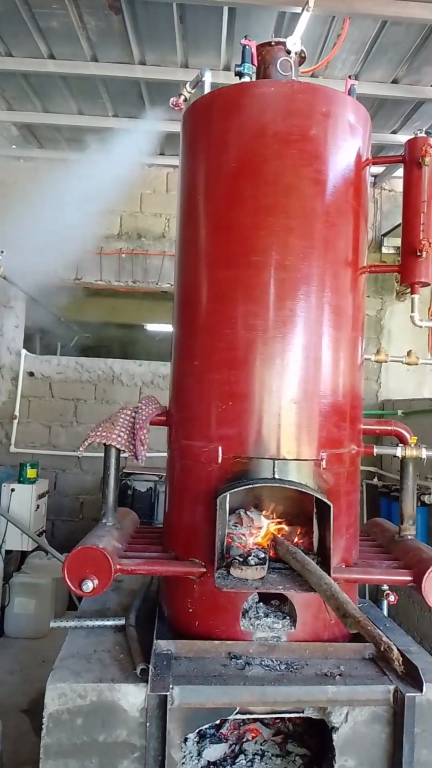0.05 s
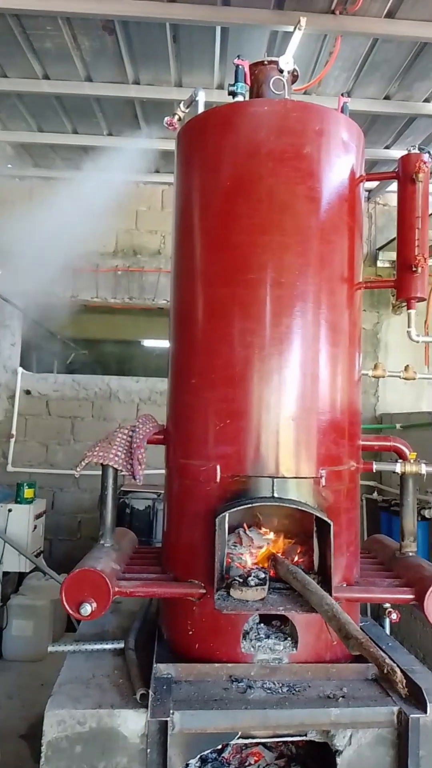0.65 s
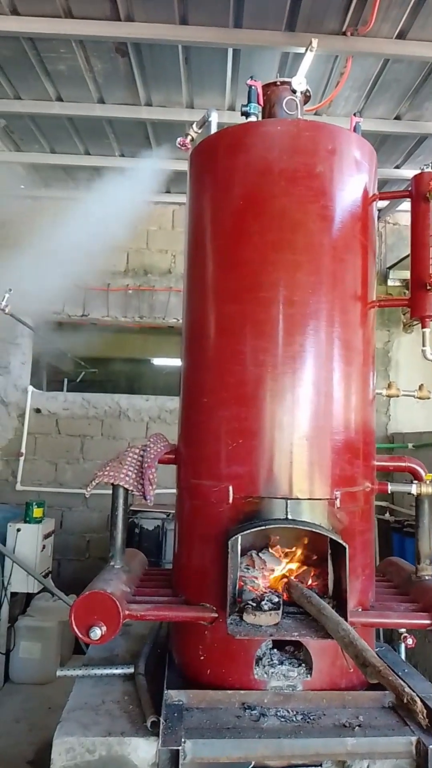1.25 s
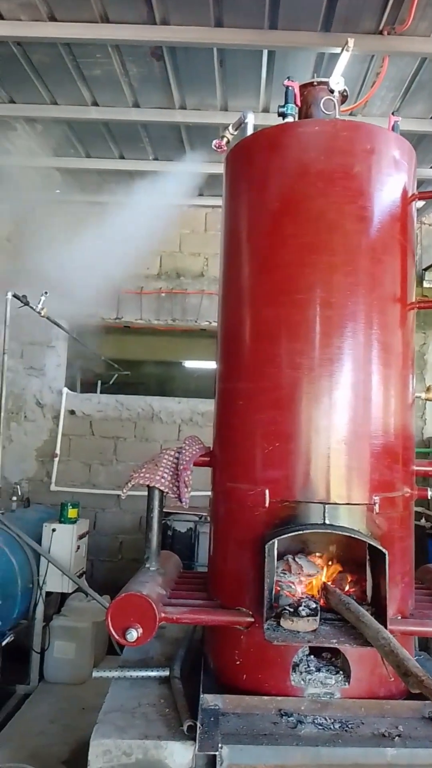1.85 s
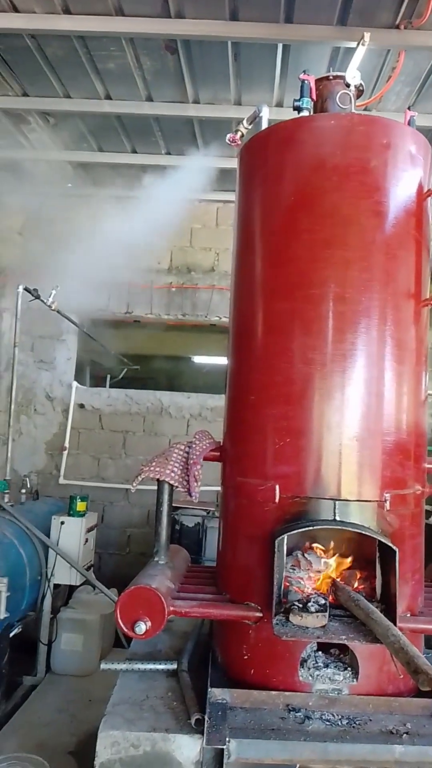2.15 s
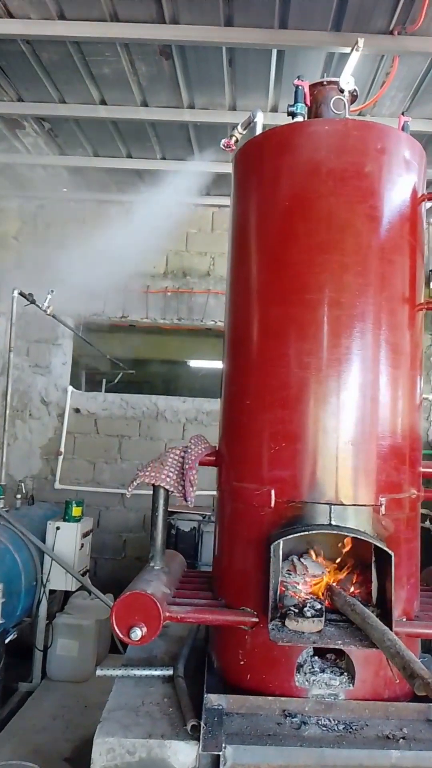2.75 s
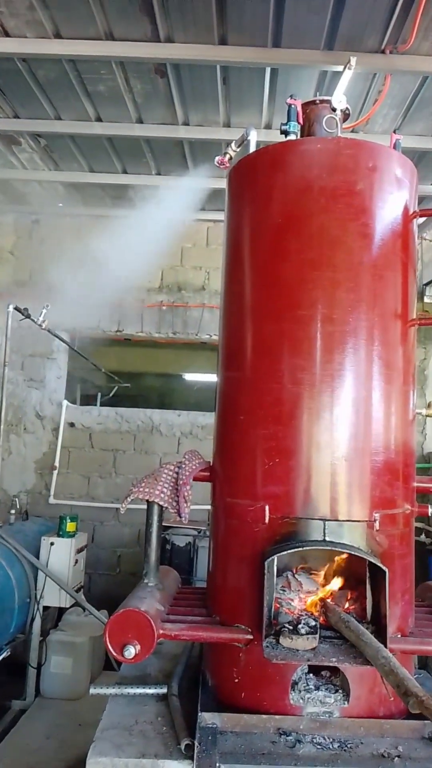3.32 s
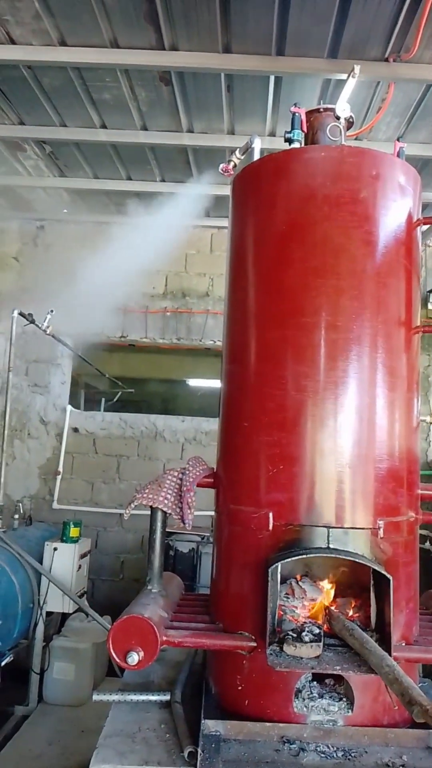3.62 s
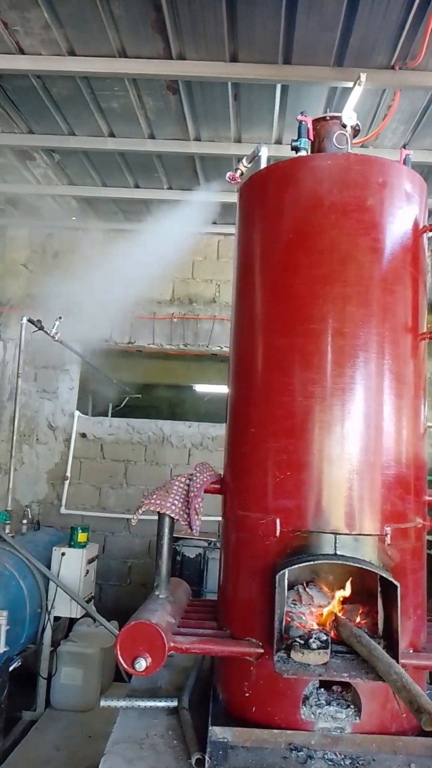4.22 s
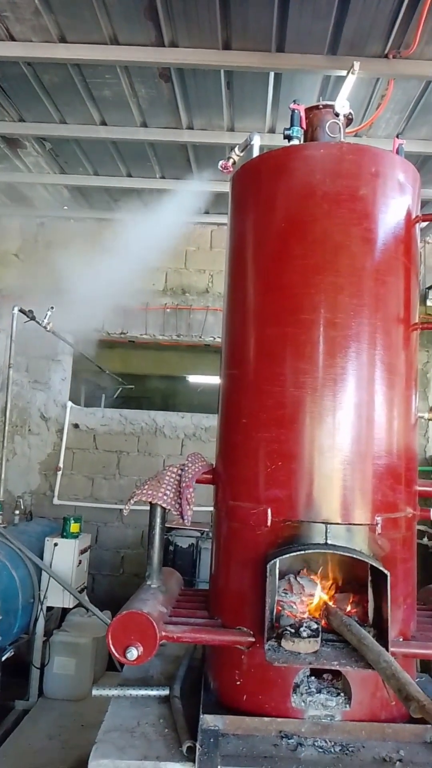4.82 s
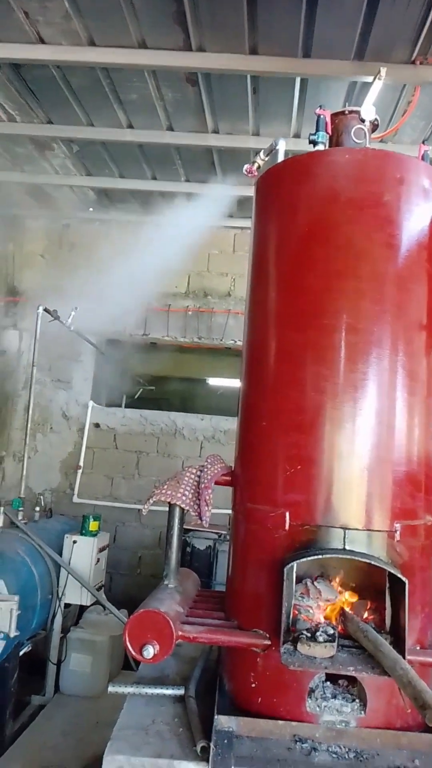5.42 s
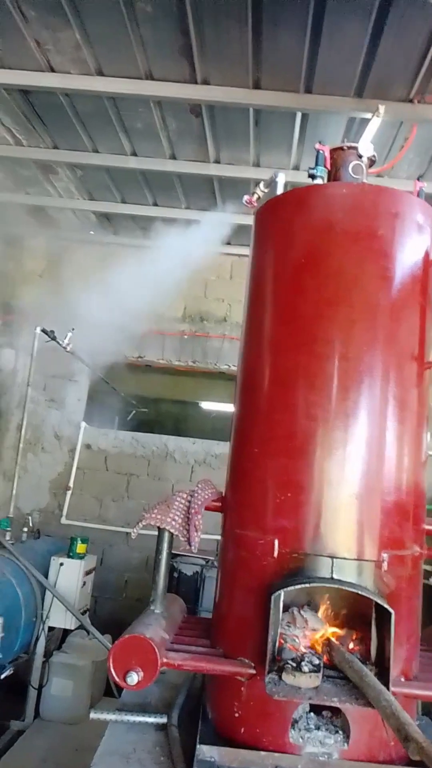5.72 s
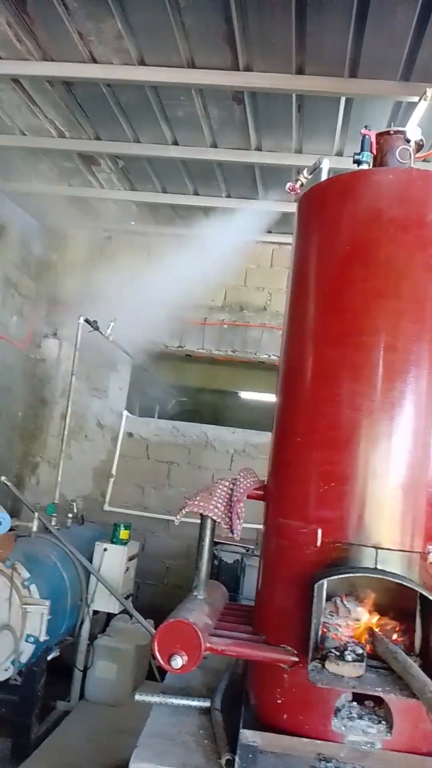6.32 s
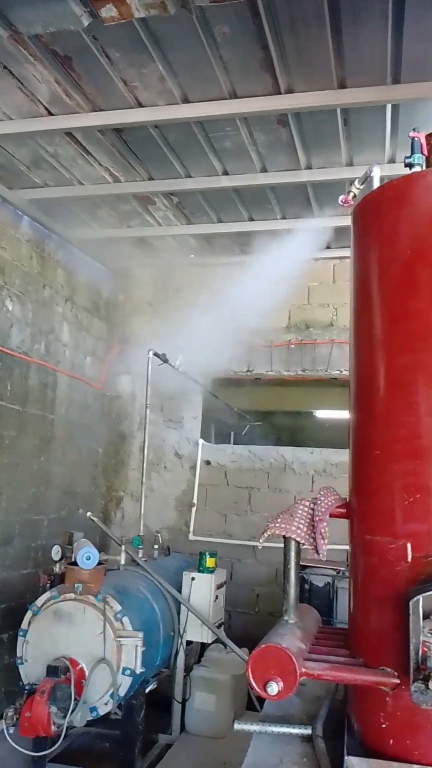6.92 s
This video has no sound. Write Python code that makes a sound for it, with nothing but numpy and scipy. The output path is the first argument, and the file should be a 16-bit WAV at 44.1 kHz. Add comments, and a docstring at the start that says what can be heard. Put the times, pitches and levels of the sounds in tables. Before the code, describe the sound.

In a workshop with block walls and a tin roof, a boiler valve vents steam in a loud, steady hiss, heard from a few metres away. Small spurts, a light high fizz and faint passing whistles run through the rush, above a barely audible fire rumble. Near the end the microphone turns towards the jet, and the tone becomes somewhat duller and more hollow while the steam keeps blowing.

```python
"""Under a tin roof, between block walls, steam blows from a valve on top of a wood-fired boiler.
The turbulent jet roars, fizzes and flutters over the faint rumble of the fire; roof and walls colour
it with resonances and drifting comb filtering. A hand-held microphone a few metres away swings late
towards the plume, and the roar turns hollower and duller. A limiter holds the peaks."""
import sys
import numpy as np
from scipy import signal
from scipy.fft import rfft, irfft
from scipy.io import wavfile
from scipy.ndimage import uniform_filter1d, minimum_filter1d

SR = 44100
rng = np.random.default_rng(int(sys.argv[2]) if len(sys.argv) > 2 else 0)


def transcribe(signal):
    """Save signal, clipped to [-1, 1], as a 16-bit WAV file at the path in sys.argv[1]."""
    frames = np.atleast_2d(signal).T
    limited = np.clip(frames, -1, 1)
    pcm = np.round(limited * 32767).astype(np.int16)
    wavfile.write(sys.argv[1], SR, pcm)


N = 306936
TIME = np.arange(N) / SR
SIZE, HOP = 2048, 512  # samples per spectral frame and between frames
HZ = np.fft.rfftfreq(SIZE, 1 / SR)
FRAME_S = np.arange(N // HOP + 5) * HOP / SR


def gain_of(db):
    """Amplitude ratio of a level in decibels."""
    return 10 ** (np.asarray(db) / 20)


def unit_rms(x):
    """Normalisation to an rms of 1."""
    return x / np.sqrt(np.mean(x ** 2) + 1e-20)


def spectrum_db(points):
    """Spectral envelope, interpolated over log frequency."""
    hz, level_db = np.transpose(points)
    return np.interp(np.log(HZ + 1), np.log(hz), level_db)


def resonance(centre_hz, width_hz):
    """Lorentzian resonance curve, 1 at its centre."""
    return 1 / (1 + (2 * (HZ - centre_hz) / width_hz) ** 2)


def step(t, at_s, length_s):
    """Smooth transition from 0 to 1 around a moment."""
    return .5 + .5 * np.tanh(2 * (t - at_s) / length_s)


def shaped_noise(shape_db):
    """Gaussian noise of rms 1 whose short-time spectrum follows an envelope."""
    real, imag = rng.standard_normal((2, len(FRAME_S), len(HZ)))
    frames = (real + 1j * imag) * gain_of(shape_db)
    return unit_rms(signal.istft(frames.T, nperseg=SIZE, noverlap=SIZE - HOP)[1][:N])


def wander(low_hz, high_hz):
    """Band-limited random modulation of rms 1."""
    hz = np.fft.rfftfreq(N, 1 / SR)
    band = hz / np.hypot(hz, low_hz) / (1 + (hz / high_hz) ** 2)
    return unit_rms(irfft(rfft(rng.standard_normal(N)) * band, N))


def fire_draught(level_db=-50.5, fade_db=5.5):
    """Flow noise: air drawn into the firebox rumbles, fading as the microphone moves off."""
    # spectrum of the draught: frequency_hz, relative_db
    draught = [(8, -12), (24, 2.5), (45, -4.5), (110, -5), (200, -9.5), (500, -29)]
    return shaped_noise(spectrum_db(draught)) * gain_of(level_db - fade_db * (TIME / TIME[-1] - .5))


def reflections_db(strength=1.15, first_s=.003, last_s=.038, drift_s=.00007, blur_hz=1100, count=60):
    """Comb filtering: echoes off roof and walls interfere with the direct sound as the hand sways."""
    coarse_s = FRAME_S[::4]
    pressure = np.ones((len(coarse_s), len(HZ)), complex)
    for place, polarity, rate, phase in rng.random((count, 4)):
        sway = np.sin(2 * np.pi * ((.052 + .197 * rate) * coarse_s + phase))
        delay_s = first_s + (last_s - first_s) * place + drift_s * sway
        amplitude = np.sign(polarity - .5) * strength / np.sqrt(count)
        pressure += amplitude * np.exp(-2j * np.pi * delay_s[:, None] * HZ)
    power = np.repeat(abs(pressure) ** 2 / (1 + strength ** 2), 4, axis=0)[:len(FRAME_S)]
    comb_db = 10 * np.log10(power + .051)  # diffuse sound partly fills the notches
    # the jet is long at low frequencies, which blurs the combs there
    return comb_db * HZ / (HZ + blur_hz)


def resonances_db(softening=.15, turn_s=5.3, turn_length_s=.66):
    """Resonances and antiresonances colour the roar, less so once the microphone has turned."""
    # bands that valve, boiler shell and roof favour or cancel: centre_hz, width_hz, gain_db
    bands = [(625, 40, 3), (878, 34, 2), (1340, 53, 3.5), (1402, 37, 5), (1623, 38, 2.5), (1745, 28, 4),
             (1784, 40, 3), (1840, 38, -0.5), (2060, 38, -1), (2342, 55, -8.5), (2406, 27, 6),
             (2660, 20, 0.5), (2740, 33, 5.5), (2754, 59, -4), (3610, 32, 3), (4000, 30, -1.5),
             (3926, 37, 5.5), (4972, 35, -1.5)]
    depth = 1 - softening * step(FRAME_S[:, None], turn_s, turn_length_s)
    return depth * sum(db * resonance(hz, width_hz) for hz, width_hz, db in bands)


def directivity_db(swing_s=5.24, swing_length_s=.29):
    """Directivity: the jet beams its roar downstream and its treble sideways, so tone follows aim."""
    # the microphone's pan away from the boiler: time_s, pan_share
    pan_path = [(0, -0.23), (2.5, -0.11), (3.4, 0.25), (5.1, 0.14), (5.95, 0.25), (6.4, 0.99), (6.96, 1.1)]
    # tone at full pan, with less rumble and treble: frequency_hz, gain_db
    pan_tone = [(300, -3), (700, -2.3), (1400, -1.2), (2200, 0.5), (3200, 0.9), (4200, -2.3), (7000, -2.8),
                (14000, -1.5)]
    # hollow tone inside the jet's beam: frequency_hz, gain_db
    beam_tone = [(300, -2), (650, 0.1), (1000, 1), (1300, 3.5), (1750, 3.5), (2100, -.5), (3200, -1.8),
                 (3750, -4), (4400, -0.9), (14000, -0.5)]
    pan = np.interp(FRAME_S, *np.transpose(pan_path))
    in_beam = step(FRAME_S, swing_s, swing_length_s)
    return np.outer(pan, spectrum_db(pan_tone)) + np.outer(in_beam, spectrum_db(beam_tone))


def whistles_db():
    """Narrow-band noise is heard as pitch: thin whistles come and go in the hiss."""
    # swelling bands: peak_s, half_length_s, centre_hz, width_hz, gain_db
    swells = [(.3, .6, 8300, 450, 2), (0.623, 0.99, 1923, 70, 6), (.7, 0.14, 2480, 170, 5.5),
              (4.7, .7, 6980, 120, 6), (5.95, 0.28, 6800, 350, 7)]
    return sum(db * np.exp(-((FRAME_S[:, None] - peak_s) / half_s) ** 2) * resonance(hz, width_hz)
               for peak_s, half_s, hz, width_hz, db in swells)


def valve_flow_db(surge_db=.6, choke_s=.054, choke_share=.98, sag_s=.044, sag_share=.83, ramp_s=.0092):
    """Unsteady flow modulates the level: wet steam surges, and at times chokes, spurts and sags."""
    # strongest spurts of the valve: start_s, length_s, gain_db
    spurts = [(0.09, 0.16, 1.5), (0.646, 0.089, 2.5), (.975, 0.085, 2.6), (1.495, 0.18, 1.5),
              (1.952, 0.045, 1.5), (2.47, 0.098, 1), (2.961, 0.048, 1.3), (3.405, 0.085, 1.5),
              (3.637, 0.042, 1.4), (4.04, 0.052, 0.9), (4.957, .06, 1), (5.54, .12, 1.5), (5.978, 0.064, 1),
              (6.575, 0.056, 0.5)]
    flow_db = surge_db * wander(3, 7)
    for start_s, length_s, db in spurts:
        moments_s = (start_s - choke_s, start_s, start_s + length_s, start_s + length_s + sag_s)
        choke, burst, end, settled = (step(TIME, at_s, ramp_s) for at_s in moments_s)
        flow_db += db * ((burst - end) - choke_share * (choke - burst) - sag_share * (end - settled))
    return flow_db


def jet_roar(flow_db, flutter, tone_db, level_db=-13.5, flutter_db=.53, sputter_db=.6, edge_hz=3200):
    """Turbulent mixing: eddies roar, and the small ones near the nozzle add a fitful treble edge."""
    # mixing noise of the jet: frequency_hz, relative_db
    mixing = [(100, -39.5), (190, -23.5), (300, -12.5), (470, -13.5), (750, -11), (1180, -6), (1400, -4),
              (2300, 1), (3100, -5.5), (4000, -8.4), (5000, -17.5), (6400, -25), (9000, -27),
              (15500, -43.5)]
    roar = shaped_noise(spectrum_db(mixing) + resonances_db() + tone_db)
    roar *= gain_of(level_db + flow_db + flutter_db * flutter)
    edge = signal.sosfiltfilt(signal.butter(3, edge_hz, "high", fs=SR, output="sos"), roar)
    edge_db = .23 * flow_db + sputter_db * wander(1.6, 40)
    return roar + edge * (gain_of(edge_db) - 1)


def droplet_fizz(flow_db, flutter, sputter, tone_db, level_db=-34.5, flutter_db=.2, sputter_db=.2):
    """Spray noise: droplets fizz in the high treble, rising and falling with the flow."""
    # fine spray at the nozzle: frequency_hz, relative_db
    spray = [(3000, -30), (6300, -6), (8300, 0), (10800, -2), (11800, -6), (12750, -12), (14000, -7.5),
             (15400, -.5)]
    envelope_db = level_db + .89 * flow_db + flutter_db * flutter + sputter_db * sputter
    return shaped_noise(spectrum_db(spray) + tone_db) * gain_of(envelope_db)


def steam():
    """Common modulation: roar and fizz flutter together with the flow through one valve."""
    flow_db = valve_flow_db()
    tone_db = reflections_db() + directivity_db() + whistles_db()
    flutter, sputter = wander(5.6, 28), wander(10, 90)
    return jet_roar(flow_db, flutter, tone_db) + droplet_fizz(flow_db, flutter, sputter, tone_db)


def scene():
    """Superposition of steam and fire, alike in both channels."""
    return np.tile(steam() + fire_draught(), (2, 1))


def record(dry, ceiling=.62, release_db_per_s=150, cutoff_hz=15520):
    """Peak limiting: the gain ducks at each peak and soon recovers; a low-pass limits the band."""
    over_db = np.maximum(20 * np.log10(abs(dry).max(0) / ceiling + 1e-9), 0)
    held_db = -minimum_filter1d(-over_db, size=33)  # running maximum
    release_db = TIME * release_db_per_s
    duck_db = uniform_filter1d(np.maximum.accumulate(held_db + release_db) - release_db, size=33)
    lowpass = signal.firwin(1023, cutoff_hz, window=("kaiser", 9), fs=SR)
    return signal.oaconvolve(dry / gain_of(duck_db), lowpass[None], "same", axes=1)


dry = scene()
out = record(dry)
transcribe(out)
```